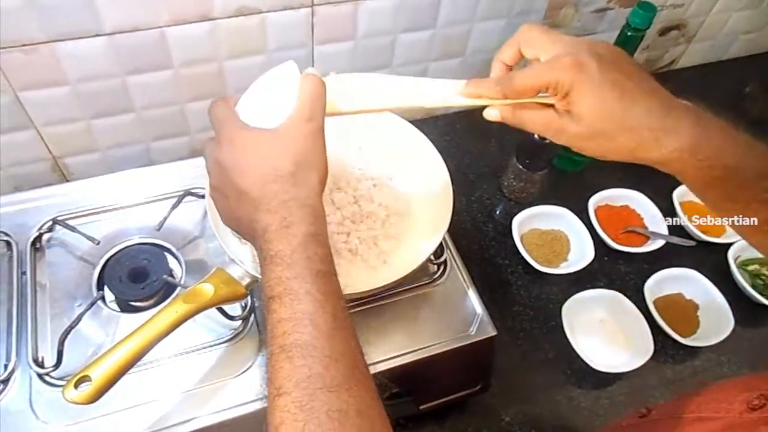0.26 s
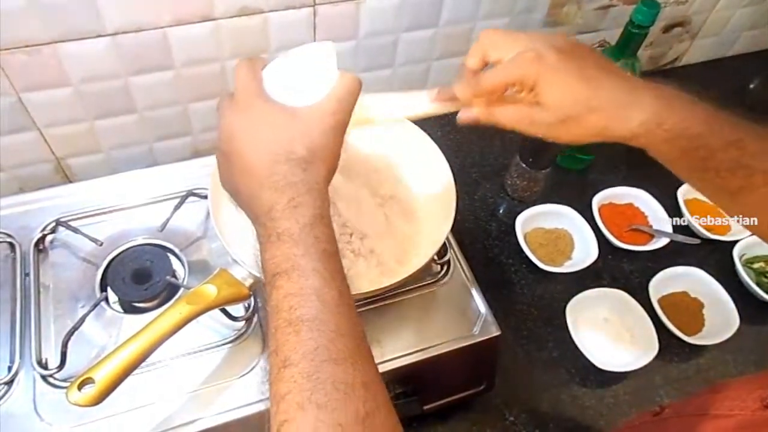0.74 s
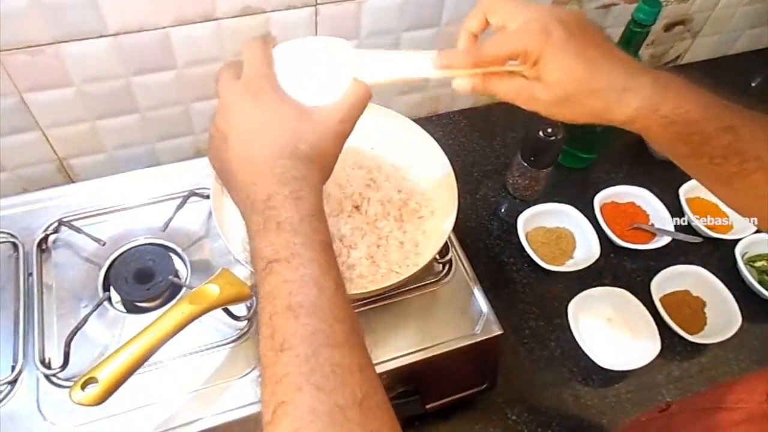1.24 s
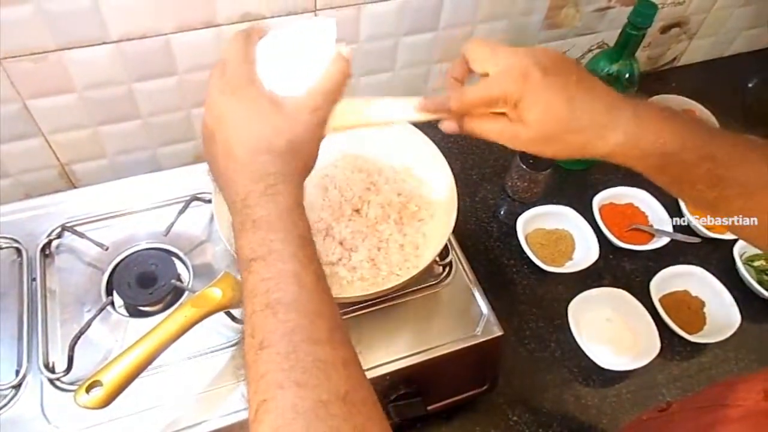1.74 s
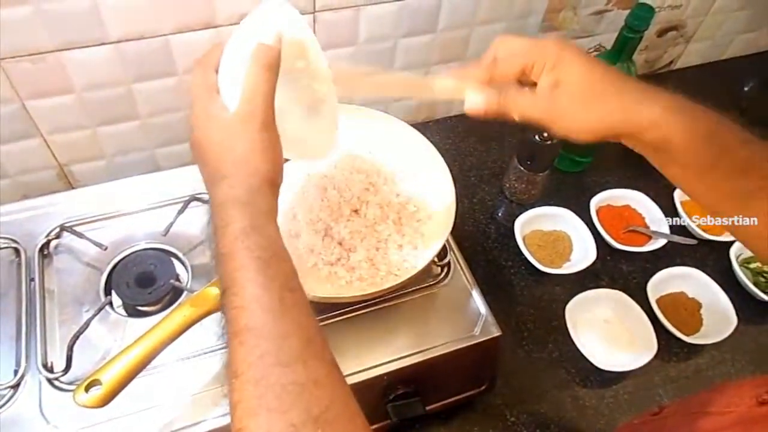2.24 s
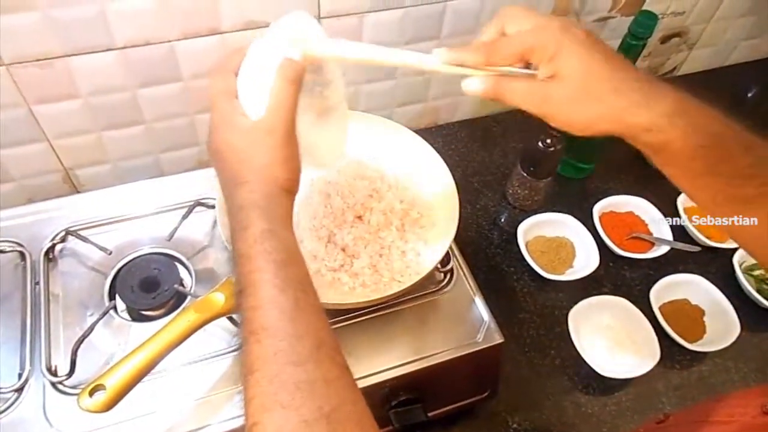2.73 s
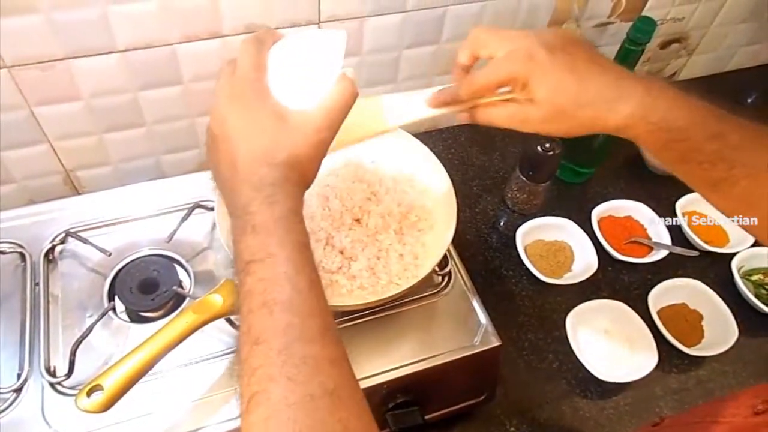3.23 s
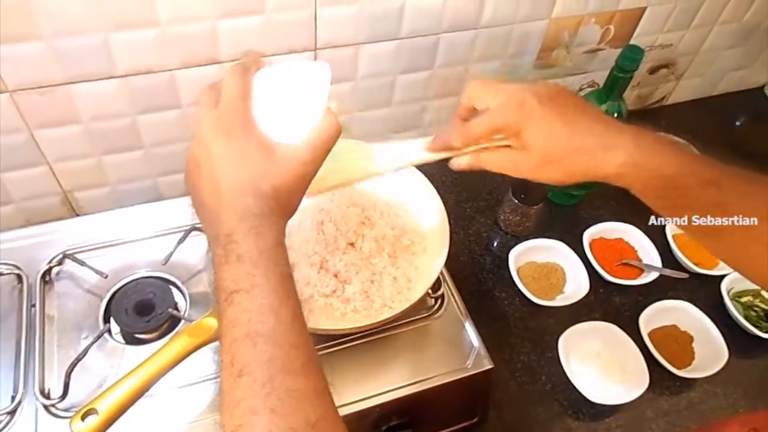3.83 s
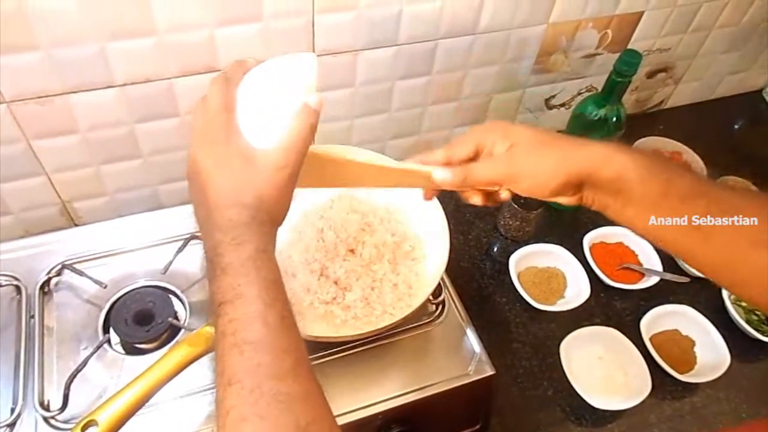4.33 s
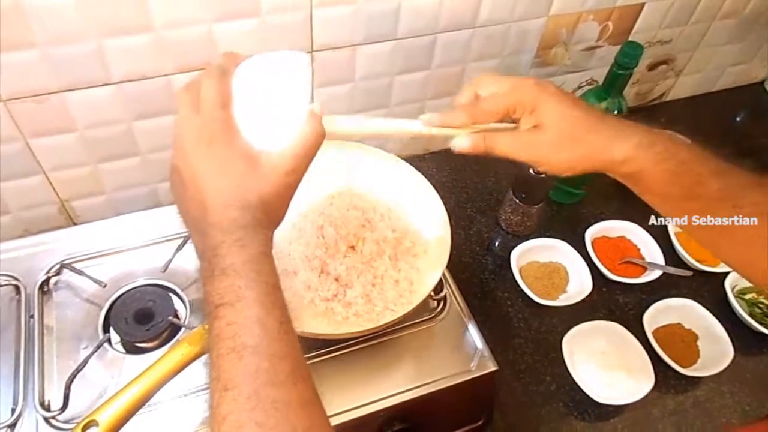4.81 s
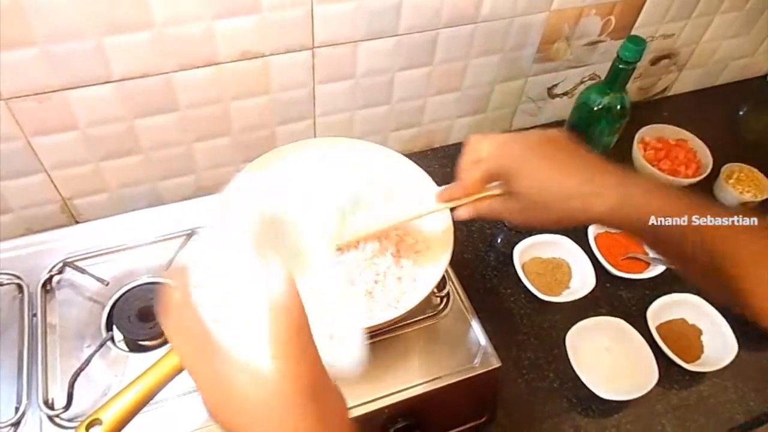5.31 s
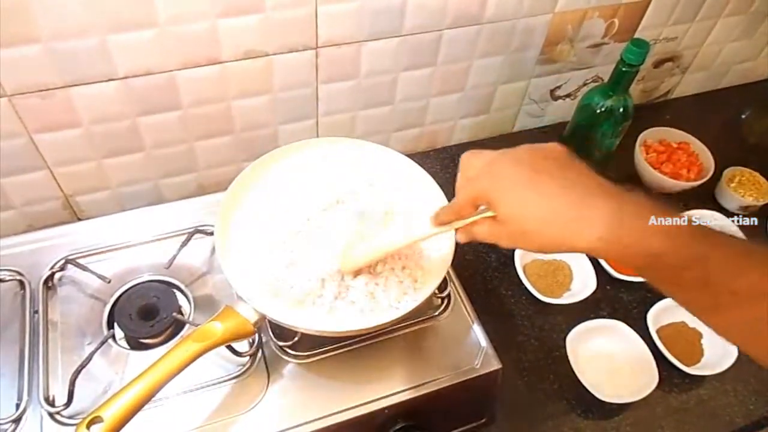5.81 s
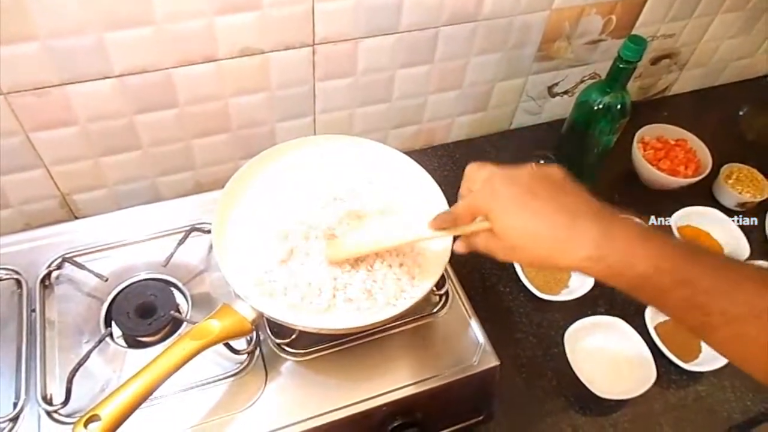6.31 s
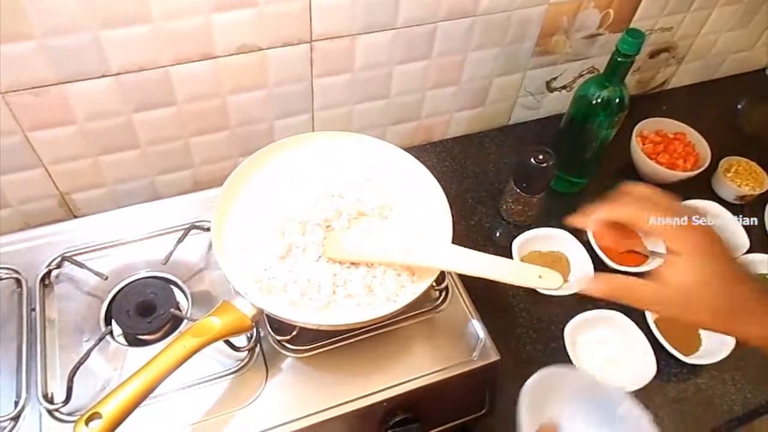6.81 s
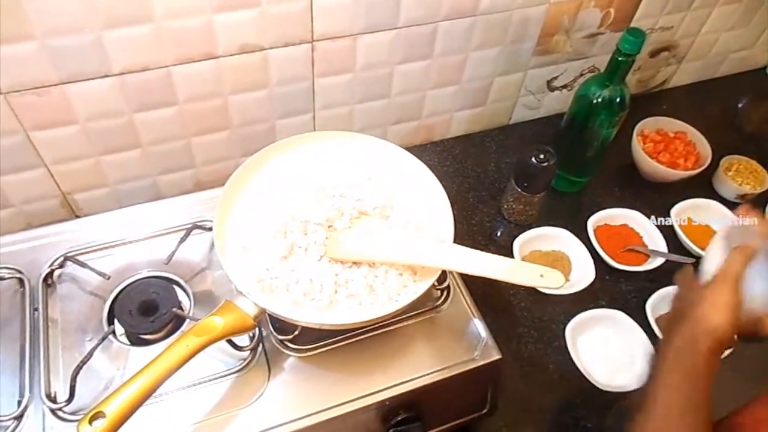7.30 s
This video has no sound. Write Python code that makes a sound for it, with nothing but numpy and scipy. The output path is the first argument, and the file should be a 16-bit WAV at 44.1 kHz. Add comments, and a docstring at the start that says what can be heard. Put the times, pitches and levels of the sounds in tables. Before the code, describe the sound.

A steady, crackling fizz of frying fills a close stereo pickup, with fine ringing bubbles and occasional sharp oil pops. Single and clustered wooden taps against bowl or pan stand out during the first five seconds, lightly reflected by kitchen tiles. Low wet swells accompany the stirring, then short dry wooden scrapes follow. The last seconds are mostly sizzle, slightly quieter, over a barely audible burner rush.

```python
"""Onion frying in a pan

Chopped onion fries in hot oil on a gas ring, in a small tiled kitchen. Steam bubbles are random
pulses and their noise haze, filtered into bands; a few ring as decaying sines, and drops of oil spit
as sharp pulses. A wooden spatula knocks (decaying modes and noise cracks), scrapes (resonant noise)
and pushes wet pieces about (swells of low noise). Faint, dull low ticks and a gas ring's noise lie below."""
import sys
import numpy as np
from scipy import signal
from scipy.fft import rfft, irfft, next_fast_len
from scipy.io import wavfile
from scipy.ndimage import uniform_filter1d

SR = 44100
rng = np.random.default_rng(int(sys.argv[2]) if len(sys.argv) > 2 else 0)


def transcribe(signal):
    """Save signal, clipped to [-1, 1], as a 16-bit WAV file at the path in sys.argv[1]."""
    frames = np.atleast_2d(signal).T
    limited = np.clip(frames, -1, 1)
    pcm = np.round(limited * 32767).astype(np.int16)
    wavfile.write(sys.argv[1], SR, pcm)


N = 332955

# Wet onion cools the oil, so coarser bubbles gain on the fizz:
# level against the frying at the start [dB], and its change [dB/s].
CRACKLE_DB, CRACKLE_DB_PER_S = -5, 0.2
BUBBLING_DB, BUBBLING_DB_PER_S = -17.5, 0.67
# The low simmer under pieces that lie still thins out instead.
SIMMER_DB, SIMMER_DB_PER_S = -29.5, -0.6
FIZZ_DB = -0.73   # the finest bubbles, against the frying


def from_db(db):
    """Level to amplitude: 20 dB is a factor of ten."""
    return 10 ** (np.asarray(db) / 20)


def rms_one(x):
    """Power normalisation: scale to a root mean square of 1."""
    return x / np.sqrt(np.mean(x ** 2) + 1e-20)


def colour(x, points):
    """Minimum-phase filtering: a causal response whose gain follows a (Hz, dB) table."""
    size = 2 * next_fast_len((N + SR // 4) // 2, True)
    hz, db = np.transpose(points)
    grid_hz = np.arange(size // 2 + 1) * SR / size
    curve = np.interp(np.log(grid_hz + 1), np.log(hz), db)
    # folding the cepstrum onto positive times makes the response causal
    cepstrum = irfft(np.log(from_db(curve)))
    cepstrum[1:size // 2] *= 2
    cepstrum[size // 2 + 1:] = 0
    response = np.exp(rfft(cepstrum))
    return irfft(rfft(x, size) * response)[..., :N]


def cut(x, hz, kind, order=4):
    """Band limiting by a maximally flat (Butterworth) filter."""
    sections = signal.butter(order, hz, kind, fs=SR, output="sos")
    return signal.sosfilt(sections, x + 1e-18)


def resonance(x, hz, width_hz):
    """Damped resonance: a two-pole band-pass with a peak gain of about 1."""
    r = np.exp(-np.pi * width_hz / SR)
    zeros = np.array([1, 0, -1]) * (1 - r * r) / 2
    poles = [1, -2 * r * np.cos(2 * np.pi * hz / SR), r * r]
    return signal.lfilter(zeros, poles, x + 1e-18)


def drift(per_s):
    """Random modulation: straight lines join per_s random values a second, with unit power."""
    knots = rng.standard_normal(N // 100)
    return rms_one(np.interp(np.arange(N) / SR * per_s, np.arange(len(knots)), knots))


def dying(s, t60):
    """Exponential decay: starts at 1 at time s and falls 60 dB in t60 seconds."""
    age = np.arange(N) / SR - s
    return (age >= 0) * np.exp(-np.log(1000) * np.clip(age / t60, 0, 10))


def frying(db, db_per_s=0):
    """Common modulation: gain per sample of a layer that follows the vigour of the frying."""
    # vigour of the frying: (time [s], level [dB])
    vigour = [(0.0, -31), (0.04, -32), (0.23, -31), (0.69, -31), (0.73, -34), (0.85, -33), (1.0, -29),
              (1.59, -30), (1.65, -32), (1.79, -30), (2.42, -30), (2.44, -29), (2.57, -33), (2.76, -32),
              (4.66, -31), (4.87, -34), (6.95, -34), (7.06, -35), (7.5, -35)]
    t = np.arange(N) / SR
    return from_db(np.interp(t, *np.transpose(vigour)) + db + db_per_s * t)


def flame():
    """Turbulent noise: the gas ring's faint, fluttering low rush, as middle and side."""
    # spectrum of the rush: (frequency [Hz], relative density [dB per Hz])
    spectrum = [(20, 0), (100, 0), (300, -2), (500, -4), (900, -14), (3000, -35)]
    level_db, flutter_db, side_db = -83.5, 1.4, -3.5
    rush = rms_one(colour(rng.standard_normal((2, N)), spectrum))
    gain = from_db(level_db + flutter_db * drift(65))
    return rush * gain * np.array([[1], [from_db(side_db)]])


def low_ticks():
    """Sparse impulses: low-pass filtered ticks, faint and dull, share the frying's level curve."""
    ticks = (rng.random(N) < 20 / SR) * rng.uniform(-1, 1, N)   # about 20 a second
    return frying(db=-49) * rms_one(cut(ticks, 480, "low", order=2))


def kitchen(x, wet_db):
    """Reverberation: direct sound plus a dense, decaying tail off the tiles."""
    tail = (rng.standard_normal(N) * dying(0.0015, t60=0.39))[:SR // 2]
    reflections = signal.fftconvolve(x, tail / np.linalg.norm(tail))[:N]
    return x + from_db(wet_db) * reflections


def shudders():
    """Damped vibration: a push on the pan leaves a low, dying rattle of noise."""
    # the pan shudders on its support: (time [s], level [dB], 60 dB decay [s])
    jolts = [(2.305, -61, 0.77), (4.448, -55.5, 0.51)]
    # spectrum of the rattle: (frequency [Hz], relative density [dB per Hz])
    spectrum = [(120, -20), (250, -6), (400, 5), (520, 11), (700, -11), (1500, -54)]
    swell = sum(from_db(db) * dying(s, t60) for s, db, t60 in jolts)
    swell = uniform_filter1d(swell, int(0.013 * SR))   # softens the onset
    return swell * rms_one(colour(rng.standard_normal(N), spectrum))


def scrapes():
    """Friction excites resonance: wood drags on the pan and briefly keeps one pitch sounding."""
    # short strokes: (middle [s], length between 1/e points [s], pitch [Hz],
    # width of each of two resonances in series [Hz], level at the middle [dB])
    strokes = [(5.206, .09, 1980, 220, -43.5), (5.54, .11, 1400, 800, -44), (5.96, .12, 1450, 700, -45),
               (5.953, .08, 2080, 220, -43.5), (6.503, .08, 3140, 350, -40.5), (7.336, .07, 1660, 220, -49),
               (7.413, .07, 1800, 300, -46)]
    t = np.arange(N) / SR
    out = np.zeros(N)
    for s, length, hz, width_hz, db in strokes:
        stroke = np.exp(-(2 * (t - s) / length) ** 2)
        drag = resonance(rng.standard_normal(N), hz, width_hz)
        drag = resonance(drag, hz, width_hz)
        out += from_db(db) * stroke * rms_one(drag)
    return out


def knocks():
    """Modal excitation: each spatula knock favours the modes near its pitch; hard contact cracks."""
    # spatula knocks: (time [s], level [dB], pitch most excited [Hz], spread [octaves],
    # noise crack level before filtering [dB])
    hits = [(1.118, -25, 1150, .22, -35), (1.120, -27.5, 640, .22, -52), (2.263, -34, 1700, .6, -28),
            (2.303, -35, 720, .5, -42), (3.116, -40, 1300, .7, -31), (3.315, -24, 1170, .15, -47),
            (3.483, -28, 860, .25, -47), (4.442, -29.5, 880, .4, -17.5), (4.752, -29.5, 890, .25, -42),
            (4.801, -44, 660, .3, -52)]
    # what spatula, bowl and pan ring with: (frequency [Hz], relative level [dB], 60 dB decay [s])
    modes = [(528, -26, 0.041), (614, -8, 0.055), (780, -22, 0.034), (902, 0, 0.038), (1163, -4, 0.037),
             (1590, -12, .04), (2000, 3, .04), (2560, -8, .03), (3100, -4, .03)]
    attack_s, crack_t60_s = 0.00095, .045
    t = np.arange(SR // 4) / SR
    attack = 1 - np.exp(-t / attack_s)
    rings, cracks = np.zeros(N + len(t)), np.zeros(N)
    for s, db, pitch_hz, octaves, crack_db in hits:
        at = int(s * SR)
        for hz, mode_db, t60 in modes:
            share = np.exp(-.5 * (np.log2(hz / pitch_hz) / octaves) ** 2)
            tone = np.sin(2 * np.pi * (hz * t + rng.random()))   # random phase
            ring = tone * np.exp(-np.log(1000) * t / t60)
            rings[at:at + len(t)] += from_db(db + mode_db) * share * ring * attack
        cracks += from_db(crack_db) * dying(s, crack_t60_s)
    cracks = cut(cracks * rng.standard_normal(N), [1700, 3700], "band", order=2)
    return kitchen(cut(rings[:N], 420, "high") + cracks, wet_db=-9)


def spits():
    """Impulse excitation: each spitting drop is one sharp pulse with a short noise spatter."""
    # drops of oil that spit: (time [s], pulse height before the high-pass [dB])
    drops = [(.877, -9), (1.352, -11), (1.389, -12), (1.532, -7), (2.466, -8), (3.228, -7), (3.655, -11),
             (4.73, -6)]
    pulses = np.zeros(N)
    spatter = np.zeros(N)
    for s, db in drops:
        pulses[int(s * SR)] = from_db(db)
        spatter += from_db(db - 28) * dying(s, .008)
    return cut(pulses + spatter * rng.standard_normal(N), 2900, "high", order=2)


def pings(per_s, cycles, size_spread_db):
    """Free bubble oscillation: sines of random pitch, losing 60 dB per given number of cycles."""
    t = np.arange(SR // 25) / SR   # each stops after 40 ms
    out = np.zeros(N + len(t))
    for when, pitch, size, sign in rng.random((int(per_s * N / SR), 4)):
        hz = 1700 * (9000 / 1700) ** pitch   # 1700 to 9000 Hz, even in octaves
        at = int(when * N)
        height = np.sign(sign - .5) * from_db(size_spread_db * size)
        decay = np.exp(-np.log(1000) * t * hz / cycles)
        out[at:at + len(t)] += height * np.sin(2 * np.pi * hz * t) * decay
    return frying(CRACKLE_DB, CRACKLE_DB_PER_S) * rms_one(out[:N])


def pushes():
    """Amplitude envelope: as the spatula pushes wet pieces, the gain swells, holds and settles."""
    # pushes: (start [s], time until settling begins [s], level [dB])
    strokes = [(0.0, 0.2, -56), (1.07, 0.16, -52.5), (2.194, 0.14, -50), (2.5, 0.52, -60),
               (3.116, .08, -54.5), (3.292, .06, -54), (3.457, 0.057, -52), (4.075, .22, -54),
               (4.45, 0.17, -54), (4.76, .05, -52.5), (4.93, 0.26, -60), (5.35, 0.094, -59),
               (5.926, 0.11, -63)]
    attack_s, settle_s = 0.022, 0.075   # linear rise; time constant of the fall
    t = np.arange(N) / SR
    gain = np.zeros(N)
    for s, length, db in strokes:
        swell = np.clip((t - s) / attack_s, 0, 1)
        settle = np.exp(-np.clip((t - s - length) / settle_s, 0, 20))
        gain += from_db(db) * swell * settle
    return gain


def bursts(per_s, size_spread_db, haze_db, flutter_db):
    """Shot noise: bubbles burst at random all over the pan, over the haze of their reflections."""
    # colour of the bursting bubbles: (frequency [Hz], filter gain [dB])
    spectrum = [(300, -45.5), (480, -35.5), (600, -19.5), (780, -12), (1000, -7), (1400, -4.5),
                (1900, -1.5), (2450, -0.5), (3600, 1.5), (5500, 2), (8500, 0.5), (11000, 0), (13000, -0.5),
                (14300, -8.5)]
    born = rng.random(N) < per_s / SR
    sizes = from_db(size_spread_db * np.minimum(rng.exponential(1, N), 6))
    pops = rms_one(born * sizes * rng.choice([-1, 1], N))
    place = rms_one(rng.uniform(-1, 1, N))
    mid_and_side = np.array([pops, pops * place])
    haze = from_db(haze_db) * rng.standard_normal((2, N))
    clusters = from_db(flutter_db * drift(110))   # bubbles come in clusters
    return colour(mid_and_side + haze, spectrum) * clusters


def larger_bubbles():
    """Forced resonance: the larger bubbles set the pan sounding."""
    # resonances of pan and tiled corner: (frequency [Hz], width [Hz], lift [dB])
    resonances = [(596, 20, 8), (735, 50, 3), (868, 36, 5), (930, 30, 6.5), (1115, 28, 3), (1180, 30, 3.5),
                  (1268, 22, 3.5), (1345, 24, 4), (1388, 28, 4), (1509, 26, 4.5), (1675, 30, 3),
                  (1810, 28, 3), (1888, 30, 2.5), (1979, 26, 4.5), (2090, 40, 2.8), (2850, 80, 1.5),
                  (3105, 85, 2.7), (3730, 120, 1.4), (4320, 80, 2)]
    larger = bursts(per_s=5000, size_spread_db=2.0, haze_db=-0.5, flutter_db=0.6)
    for hz, width_hz, lift_db in resonances:
        larger = larger + (from_db(lift_db) - 1) * resonance(larger, hz, width_hz)
    return larger


def sizzle():
    """Size and pitch: the smaller the bubbles, the higher they sound and the more of them burst."""
    finest = bursts(per_s=11000, size_spread_db=2.0, haze_db=-3, flutter_db=0.47)
    in_oil, under_onion = larger_bubbles(), larger_bubbles()
    fizz = rms_one(cut(finest, 4500, "high", order=5))
    crackle = cut(in_oil, 1700, "high", order=5)
    crackle = rms_one(cut(crackle, 4500, "low", order=5))
    bubbling = cut(under_onion, 835, "high", order=9)
    bubbling = rms_one(cut(bubbling, 1700, "low", order=5))
    low = rms_one(cut(in_oil, 760, "low", order=5))
    low_gain = np.hypot(frying(SIMMER_DB, SIMMER_DB_PER_S), pushes())   # powers add
    return (frying(FIZZ_DB) * fizz
            + frying(CRACKLE_DB, CRACKLE_DB_PER_S) * crackle
            + frying(BUBBLING_DB, BUBBLING_DB_PER_S) * bubbling
            + low_gain * low)


def port(x, sign):
    """Level and phase differences between two microphone ports: sign 1 is left, -1 right."""
    # how the ports differ: (frequency [Hz], left minus right [dB], left leads by [radians])
    differences = [(4300, 0, 0), (6300, -1, .26), (8800, -.6, .16), (10200, .7, .35), (11400, -.5, .68),
                   (12600, -2.3, .65), (14000, -3.5, .5)]
    hz, lean_db, lead = np.transpose(differences)
    size = next_fast_len(N + SR // 10)
    grid_hz = np.arange(size // 2 + 1) * SR / size
    # each port takes half of the difference
    gain = from_db(sign * np.interp(grid_hz, hz, lean_db) / 2)
    phase = np.exp(.5j * sign * np.interp(grid_hz, hz, lead))
    return irfft(rfft(x, size) * gain * phase, size)[:N]


def scene():
    """Middle-side stereo: single sounds are central; sizzle and flame also have a side signal."""
    # stereo width of the sizzle: (frequency [Hz], gain of its side signal [dB])
    width = [(500, -11), (900, -19), (1250, -27.5), (2600, -79), (3500, -32), (4400, -17), (5300, -10.5),
             (7500, -8.5), (9500, -6.5), (11500, -5.5), (14000, -5)]
    mid, side = sizzle()
    rush_mid, rush_side = flame()
    ringing = from_db(-11.5) * pings(per_s=220, cycles=295, size_spread_db=10.0)
    oil = spits() + ringing
    spatula = knocks() + scrapes() + shudders()
    mid = mid + oil + spatula + rush_mid
    mid = mid + low_ticks()   # faint, dull low ticks
    side = colour(side, width) + rush_side
    return np.array([port(mid + side, 1), port(mid - side, -1)])


def record(dry):
    """Band limitation: a steep elliptic low-pass removes the top of the spectrum."""
    cutoff_hz, ripple_db, rejection_db = 14250, .1, 90
    sections = signal.ellip(12, ripple_db, rejection_db, cutoff_hz, fs=SR, output="sos")
    return signal.sosfilt(sections, dry)


dry = scene()
out = record(dry)
transcribe(out)
```